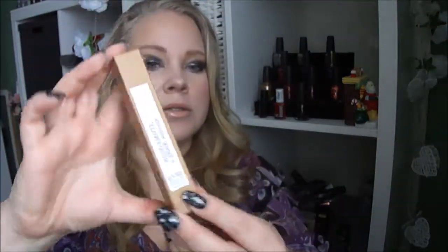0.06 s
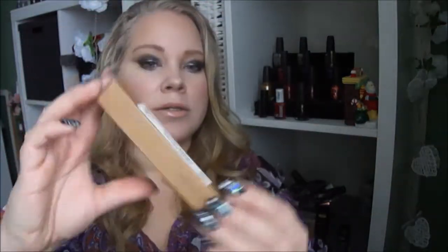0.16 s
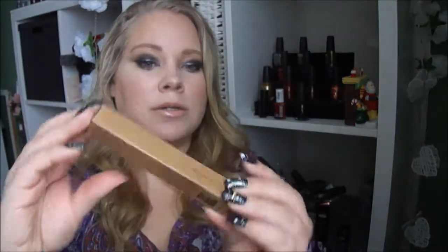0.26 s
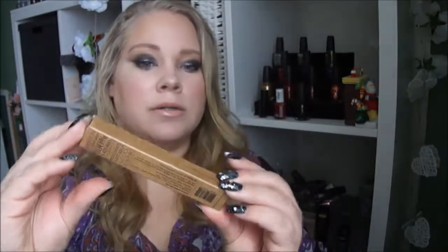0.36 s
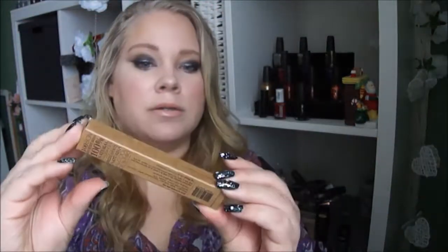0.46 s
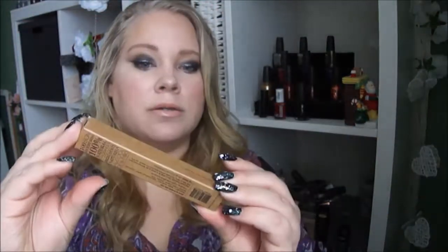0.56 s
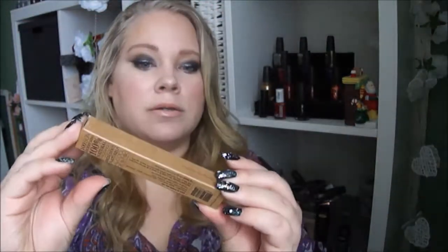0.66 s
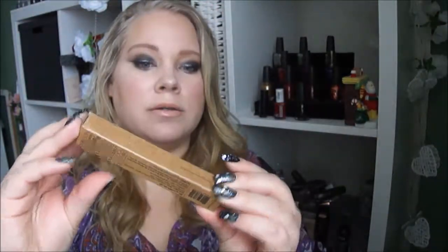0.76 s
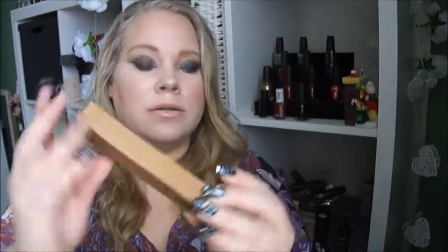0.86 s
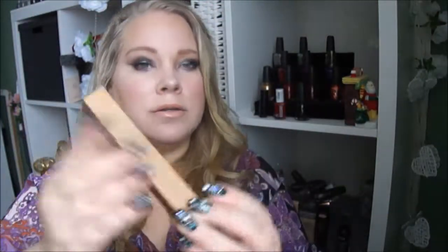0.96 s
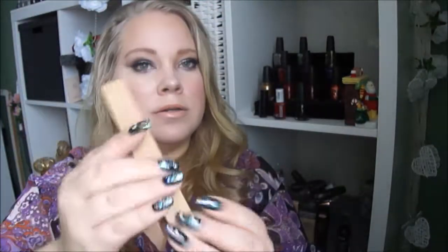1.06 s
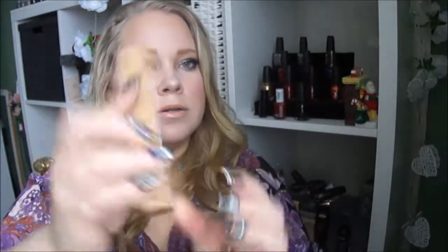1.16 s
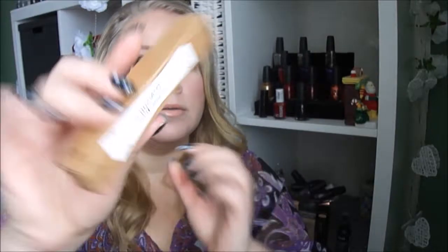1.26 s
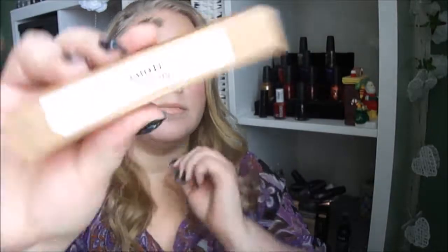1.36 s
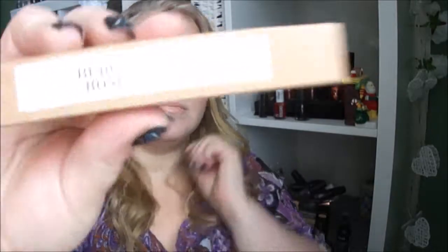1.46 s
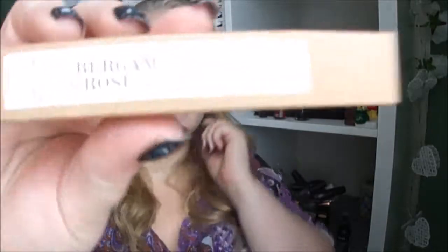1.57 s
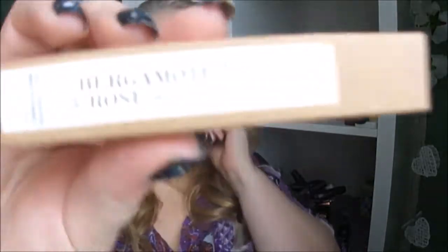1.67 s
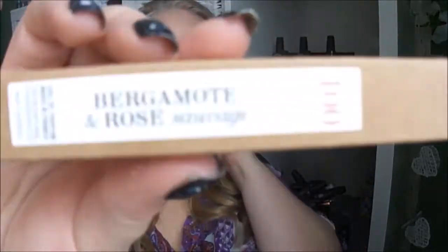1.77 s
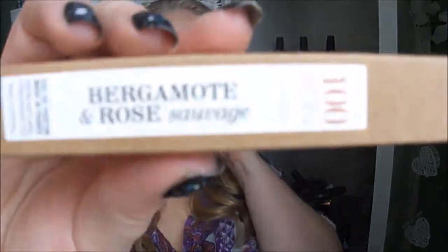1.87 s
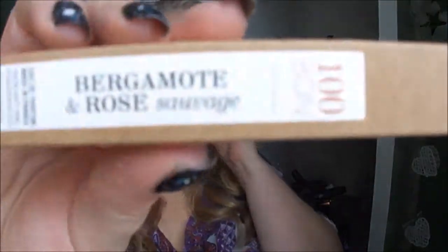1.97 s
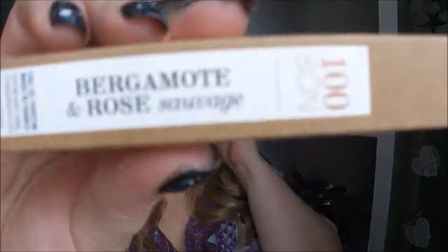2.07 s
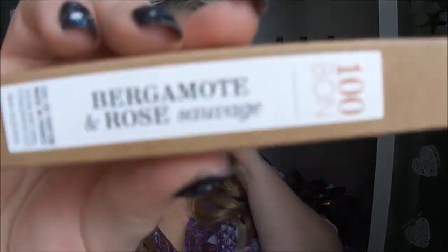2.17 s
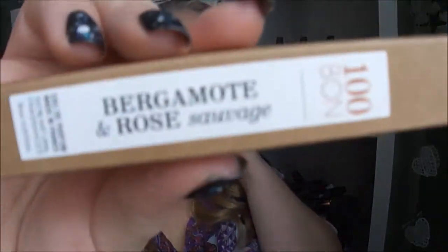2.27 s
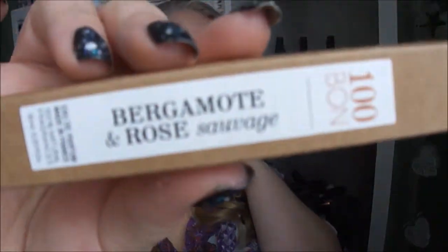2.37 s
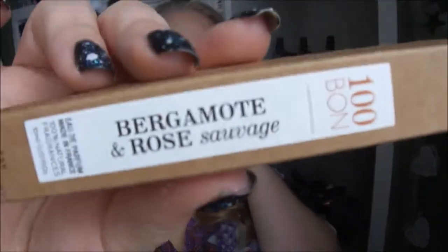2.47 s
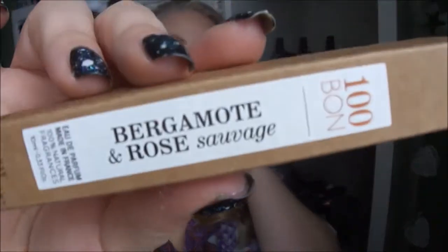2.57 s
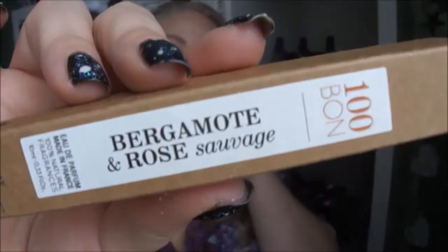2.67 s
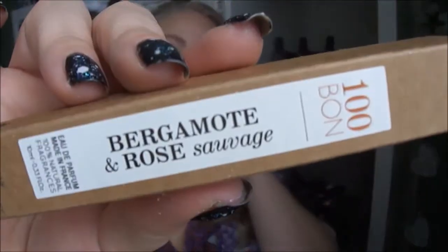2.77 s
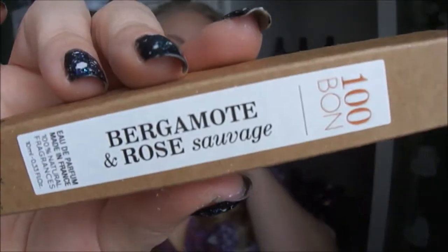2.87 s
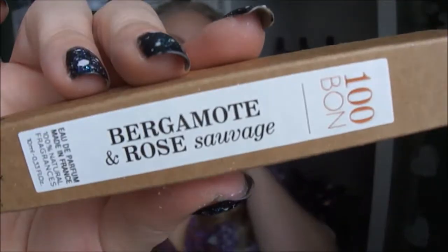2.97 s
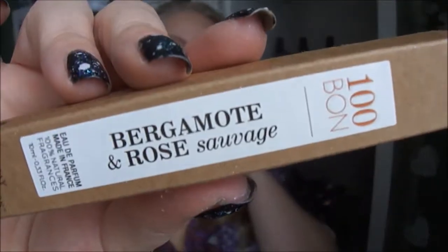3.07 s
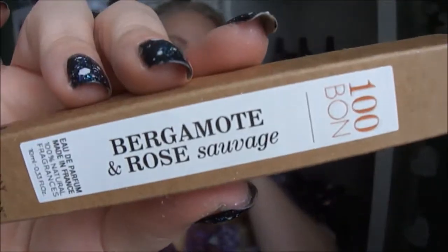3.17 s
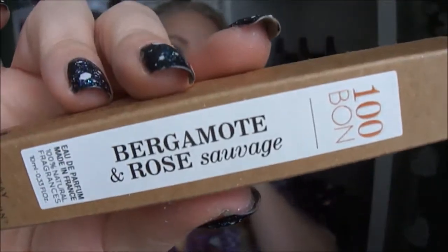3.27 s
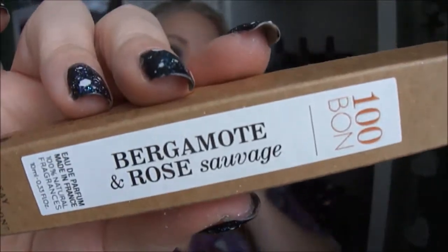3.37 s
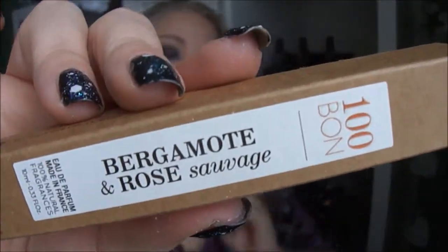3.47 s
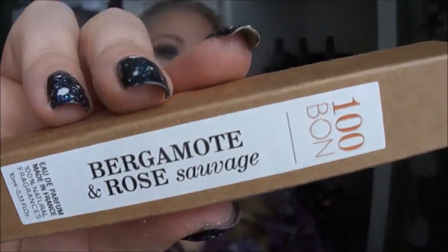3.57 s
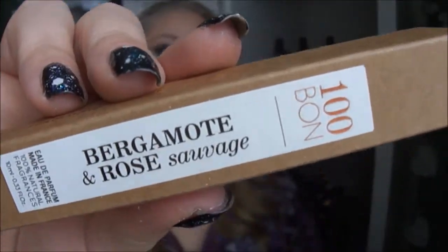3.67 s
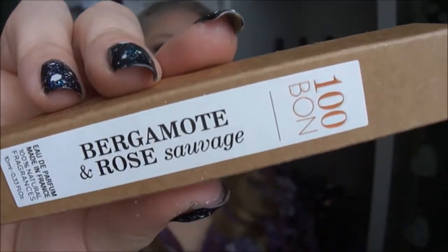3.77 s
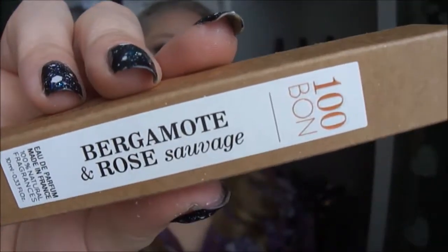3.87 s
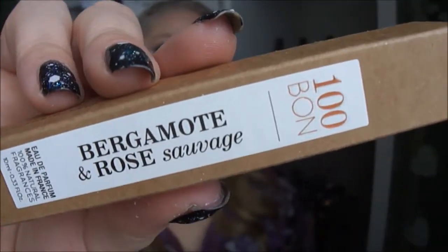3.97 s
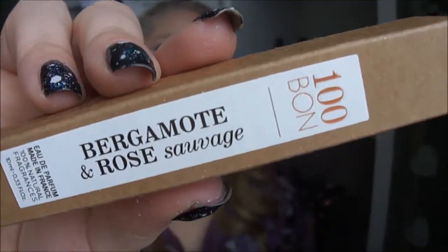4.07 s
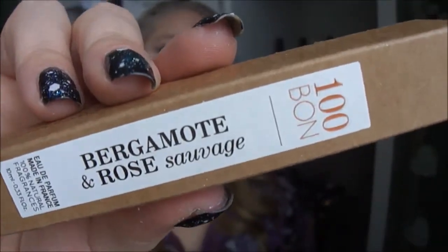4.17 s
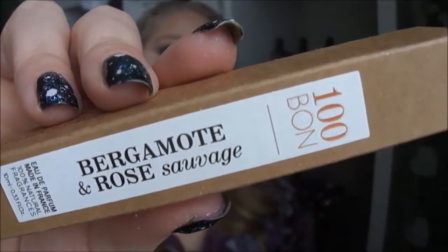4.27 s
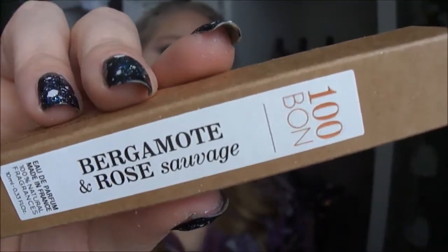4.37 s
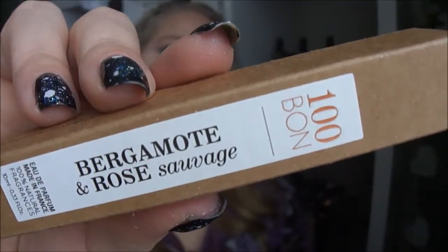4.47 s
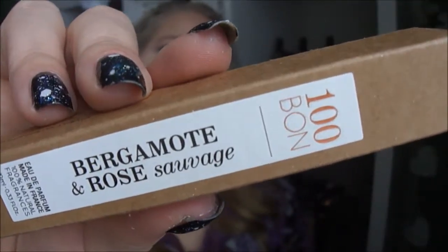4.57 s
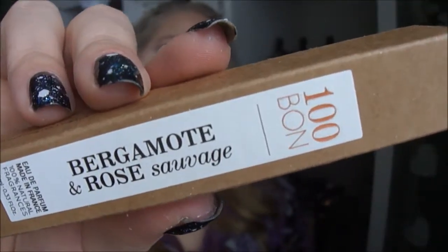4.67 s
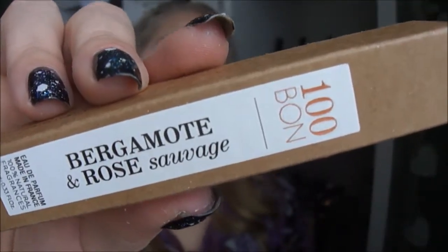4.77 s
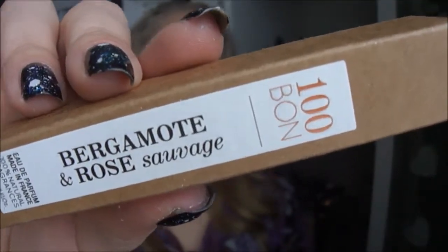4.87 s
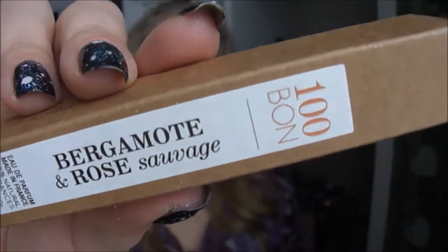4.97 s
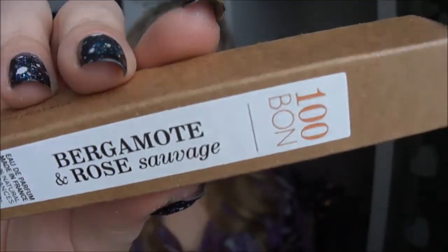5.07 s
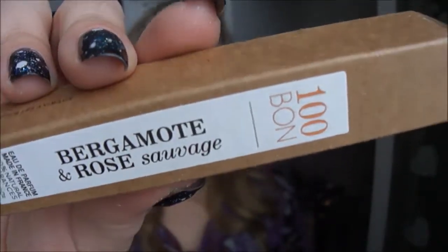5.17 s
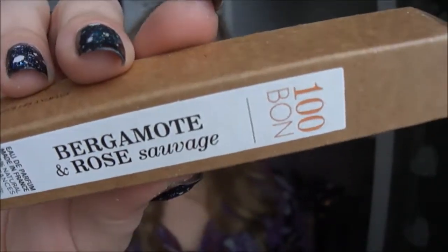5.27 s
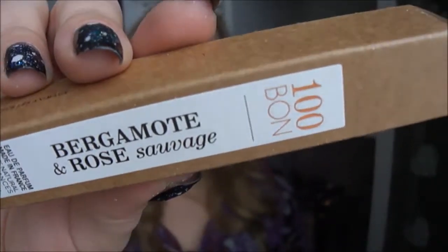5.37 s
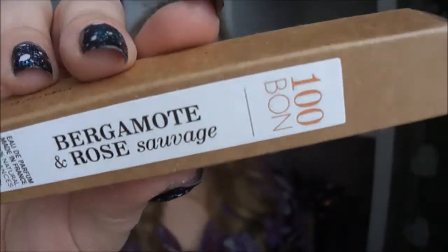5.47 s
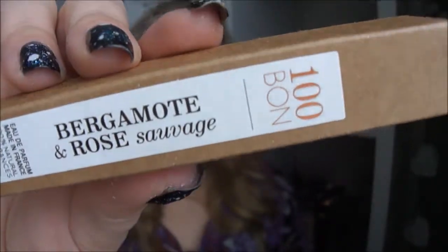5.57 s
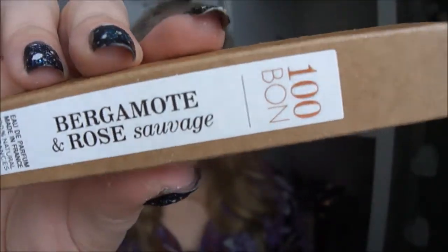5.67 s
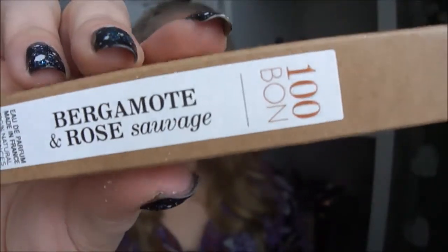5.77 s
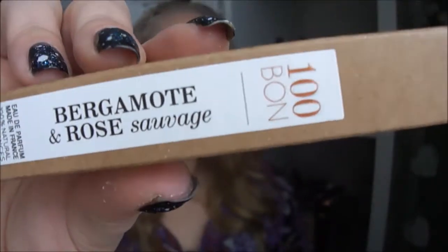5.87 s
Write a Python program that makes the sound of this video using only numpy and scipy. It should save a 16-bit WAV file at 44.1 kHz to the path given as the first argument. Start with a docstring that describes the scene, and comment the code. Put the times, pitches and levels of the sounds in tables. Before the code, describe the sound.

Close to a camera microphone in a small quiet room, fingers with long nails turn a slim cardboard box. Dry clicks, hollow knocks and brief scuffs cluster in the first half second, pause, then return from about one to just under two seconds. Afterwards come only sparse faint taps, with a clearer one near 3.7 seconds and a last knock at the end. Soft hiss and faint camera focus ticking lie behind.

```python
"""Fingers with long nails turn a slim cardboard box close to a camera microphone in a quiet room.
Nails and loose contents knock on the card: short bursts of contact ring the box's modes.
Skin and nails rub along it: dense random grains ring the same modes more briefly, stroke by stroke.
Behind them lie a faint room hiss of shaped noise, two thin electronic tones, and the camera's focus
drive, which ticks once a picture field while it hunts. Short echoes put a little room around the box."""
import sys
import numpy as np
from scipy import signal
from scipy.fft import rfft, irfft, next_fast_len
from scipy.io import wavfile
from scipy.ndimage import uniform_filter1d

SR = 44100
rng = np.random.default_rng(int(sys.argv[2]) if len(sys.argv) > 2 else 0)


def log_audio(samples):
    """Write samples as a 16-bit WAV file to the path given in sys.argv[1]."""
    # one column per channel
    frames = np.atleast_2d(samples).T
    # limit to full scale, then quantise
    limited = np.clip(frames, -1, 1)
    pcm = np.round(limited * 32767).astype(np.int16)
    wavfile.write(sys.argv[1], SR, pcm)


N = 261361  # length in samples

# Room tone at the microphone. Each row: frequency in Hz, relative density in dB per Hz.
ROOM_TONE = [(12, -53), (20, -23), (86, -15.5), (110, -11), (237, -3.5), (264, -2.5), (301, -2),
             (383, -1.5), (996, -2.5), (1170, -4.5), (1520, -5.5), (5460, -16), (6240, -16), (10600, -20),
             (11500, -22), (15000, -65), (22000, -120)]
HISS_DB = -52.0  # rms, ahead of the microphone's band limit

# Thin tones of the camera electronics. Each row: frequency in Hz, level in dB rms.
WHINE_TONES = [(7854, -81.5), (7881, -73)]

# Lens barrel, rung by the focus drive. Each row: frequency in Hz, relative level in dB, t60 in seconds.
BARREL_MODES = [(4630, -26, 0.0054), (6070, -20, 0.008), (6280, -4.5, 0.0071), (7300, -8.5, 0.0064),
                (9650, -11, 0.0022)]
# Spells of focus hunting. Each row: start in seconds, end in seconds,
# tick force in dB at the start, tick force in dB at the end.
FOCUS_HUNTS = [(-0.1, 0.615, -37, -41), (1.3, 4.7, -39, -43.5), (5.42, 5.85, -44, -38.5)]
FIELD_HZ, FIRST_TICK_S = 59.94, .0054
TICK_SPREAD_DB = 2.0  # scatter from tick to tick
JOLT_DB = 9.0  # the first and last step of a hunt are harder
WANDER_DB, WANDER_TICKS = 1.2, 4  # slower drift of the force

ROOM_T60_S, ROOM_DB, WALL_CUT_HZ = 0.12, -22, 11000

# What the box rings with. Each row: frequency in Hz, relative level in dB, t60 in seconds.
BOX_MODES = [(352, 5, 0.012), (483, -2.3, 0.032), (582, 0.75, 0.02), (840, 3, 0.014), (1016, 1.3, 0.015),
             (1255, 2.5, 0.017), (1435, -2.5, 0.017), (1836, 4.5, 0.011), (2190, 0, 0.017),
             (2450, -3.5, 0.019), (2933, 2.5, 0.011), (3350, -4.5, 0.012), (3727, 1, 0.0093),
             (4545, 3.5, 0.0059), (5750, 5.5, 0.0042), (6430, 4, 0.0062), (7730, 10, 0.0017),
             (9070, 2, 0.0039), (10040, 10, 0.0012)]

# Skin and nails sliding on the card. Each row: start in seconds, length in seconds, level in dB at the
# nominal end, brightness in dB per octave about 2400 Hz, fade over the stroke in dB.
STROKES = [(0.033, 0.037, -50.5, -1, -5.5), (0.096, 0.03, -54.5, 0.5, 14.5), (0.202, 0.035, -59.5, -1, 5),
           (0.32, 0.02, -51.5, 3, 1), (0.345, 0.017, -38.5, -1.5, -2), (0.367, 0.044, -56.5, -2.5, 14.5),
           (0.423, 0.021, -55, 4, 1), (0.474, 0.032, -61.5, -4.5, 10), (0.898, 0.035, -50, -0.2, -6),
           (0.951, 0.043, -49.5, 0.9, 9), (1.068, 0.04, -50, -0.6, 4), (1.131, 0.026, -50, 1, 1.5),
           (1.165, 0.028, -57, -0.5, 4), (1.215, 0.022, -45, 6.5, -6), (1.245, 0.051, -53, 0, -1),
           (1.292, 0.027, -48.5, 1, 4), (1.322, 0.04, -46.5, 1.5, 4), (1.372, 0.013, -44.5, 6.5, -4),
           (1.384, 0.028, -54.5, -4.5, 18), (1.431, 0.063, -50, -2.2, 1.5), (1.533, 0.054, -55.5, 2, -2.5),
           (1.613, 0.07, -51.5, 2, -8.5), (3.476, 0.14, -63.5, 4.5, -2), (5.857, 0.012, -64, -1, 3.5),
           (5.895, 0.02, -51.5, -0.5, 8)]
# Edges of the rubbing bands, in Hz.
RUB_EDGES_HZ = [600, 1700, 3300, 6000, 11500]
# Colour of a plain stroke. Each entry: level of one rubbing band in dB.
PLAIN_STROKE_DB = [-2, 1, -4.5, -3]
RUB_GRAINS_PER_S = 4000

# Knocks on the box. Each row: start in seconds, hollow thud in dB, wall in dB, nail snap in dB,
# wall pitch in Hz, contact in ms.
BOX_KNOCKS = [(0.0197, -38.5, -31.5, -37.5, 1110, 3.9), (0.092, -45.5, -48, -31.5, 2170, 4.3),
              (0.1036, -34, -34, -35, 1330, 0.93), (0.181, -50, -47, -42.5, 1580, 2.7),
              (0.2074, -47, -49, -62, 2200, 1.4), (0.3138, -49, -50, -39, 1860, 1.6),
              (0.3196, -40.5, -37, -33, 3480, 1.8), (0.3416, -30.5, -22, -22.5, 1410, 2.1),
              (0.3577, -25, -18.5, -24.5, 1430, 0.71), (0.3758, -53, -51, -54, 2240, 1.8),
              (0.4204, -42, -36.5, -32, 2580, 1.2), (0.4733, -60, -37.5, -35, 2600, 2.1),
              (0.9197, -55, -35.5, -50, 2550, 1.8), (0.9498, -27, -16.5, -23, 2540, 3.3),
              (1.0685, -41, -47, -42, 2350, 1.4), (1.0784, -33.5, -32.5, -32.5, 2240, 2.2),
              (1.1338, -64, -44, -37, 2240, 2.2), (1.1443, -64, -41.5, -34, 2000, 2.3),
              (1.1683, -48, -48, -46, 1770, 1.8), (1.2907, -35.5, -17.5, -18.5, 2540, 1.1),
              (1.32, -26, -20.5, -24, 1840, 7.2), (1.3217, -27, -28, -20.5, 1820, 5.2),
              (1.3811, -37.5, -22, -38, 3040, 5.8), (1.3851, -43, -21.5, -47, 2110, 1.1),
              (1.4361, -41, -28.5, -35.5, 2500, 6.6), (1.471, -48, -34.5, -36.5, 1320, 1.5),
              (1.5226, -36.5, -30.5, -42, 2060, 1.6), (1.6573, -31, -28.5, -31, 2040, 0.9),
              (1.6595, -33, -27, -48, 3160, 6.8), (1.67, -30.5, -29, -31.5, 1890, 4.4),
              (1.6826, -38.5, -39, -47, 2900, 3.1), (1.7231, -50, -43, -49, 1860, 1.8),
              (1.7357, -51, -37, -47.5, 2020, 2.4), (1.9754, -49.5, -47.5, -52, 2790, 1.6),
              (2.0188, -38.5, -31, -37, 2080, 2.6), (2.285, -43, -52, -48, 2820, 1.8),
              (2.4123, -46, -44, -49, 2240, 3.5), (2.4175, -41.5, -33.5, -50, 2300, 2.1),
              (2.488, -48, -56, -54, 2880, 2.5), (3.6923, -24.5, -32, -37, 1970, 1.6),
              (3.7011, -32.5, -23, -22.5, 3200, 2.8), (4.01, -42, -47, -44, 2830, 4.3),
              (4.083, -51, -60, -41.5, 3120, 2.5), (4.2693, -39, -36, -42, 3430, 3.4),
              (4.5035, -47, -46.5, -45, 2860, 1.7), (5.893, -62, -35, -54, 2120, 1.2),
              (5.8954, -28, -24.5, -36.5, 2140, 0.74), (5.9068, -39, -30.5, -33.5, 1730, 1.2),
              (5.92, -36, -45, -45, 2780, 1.3)]
# Pitch of the hollow, which changes with the grip. Each row: time in seconds, pitch in Hz.
HOLLOW_PITCH = [(0.0, 800), (0.3, 970), (0.48, 1050), (0.9, 637), (1.3, 602), (1.39, 736), (1.66, 604),
                (2.0, 517), (3.69, 540), (3.702, 440), (4.0, 710), (5.89, 577), (5.91, 764)]
THUD_FALL_DB_PER_OCTAVE = 3.5  # below the hollow's pitch
SNAP_HZ, SNAP_FALL_DB_PER_OCTAVE = 3760, 4.5  # the snap falls off above this pitch
FAVOUR_DB, FAVOUR_OCTAVES = 6.5, 0.24  # lift of modes near the wall or hollow pitch, and its reach
VALLEY_DB = 4  # dip midway between thud and wall
MODE_SPREAD_DB = 1.5  # scatter of each mode from knock to knock

MIC_EDGE_HZ, CUTOFF_HZ = 11000, 12360


def from_db(db):
    """Gain of a level in dB."""
    return 10 ** (np.asarray(db) / 20)


def rms_one(x):
    """Scales to unit rms."""
    return x / np.sqrt(np.mean(x ** 2) + 1e-20)


def ring(clicks, hz, t60):
    """A damped resonance: a unit click sets off a decaying sine that starts from height 1."""
    radius = from_db(-60 / (t60 * SR))
    w = 2 * np.pi * hz / SR
    return signal.lfilter([0, np.sin(w)], [1, -2 * radius * np.cos(w), radius ** 2], clicks + 1e-18)


def hiss():
    """Steady noise with the colour of the quiet room and the microphone."""
    size = next_fast_len(N)
    hz = np.maximum(np.arange(size // 2 + 1) * SR / size, 1)
    tone_hz, tone_db = np.transpose(ROOM_TONE)
    colour = from_db(np.interp(np.log(hz), np.log(tone_hz), tone_db))
    noise = irfft(rfft(rng.standard_normal(size)) * colour, size)[:N]
    return from_db(HISS_DB) * rms_one(noise)


def whine():
    """The camera electronics give steady sines, each with a random starting phase."""
    t = np.arange(N) / SR
    out = np.zeros(N)
    for hz, db in WHINE_TONES:
        out += np.sqrt(2) * from_db(db) * np.sin(2 * np.pi * (hz * t + rng.random()))
    return out


def focus_drive():
    """The drive steps at the field rate with uneven force, and each step rings the lens barrel."""
    ticks = np.arange(FIRST_TICK_S, N / SR - .01, 1 / FIELD_HZ)
    luck = rng.standard_normal((len(ticks), 2))
    wander = rms_one(uniform_filter1d(luck[:, 1], size=WANDER_TICKS))
    uneven_db = TICK_SPREAD_DB * luck[:, 0] + WANDER_DB * wander
    steps = np.zeros(N)
    for start, end, *levels_db in FOCUS_HUNTS:
        on = np.flatnonzero((ticks >= start) & (ticks <= end))
        force_db = np.interp(ticks[on], [start, end], levels_db) + uneven_db[on]
        to_nearest_end = np.minimum(ticks[on] - start, end - ticks[on])
        force_db += JOLT_DB * (to_nearest_end < 1 / FIELD_HZ)
        steps[np.round(ticks[on] * SR).astype(int)] = from_db(force_db)
    steps = signal.lfilter(np.hanning(5), 2, steps)  # each step is a soft pulse, not a bare click
    return sum(from_db(db) * ring(steps, hz, t60) for hz, db, t60 in BARREL_MODES)


def room(x):
    """Eight feedback delays return the sound from the walls, duller on every round."""
    size = next_fast_len(N + SR // 2)
    w = 2 * np.pi * np.arange(size // 2 + 1) / size
    dull = 1 / (1 + 1j * w * SR / (2 * np.pi * WALL_CUT_HZ))
    response = 0
    for k, lag in enumerate(rng.uniform(.004, .022, 8) * SR):
        loop = from_db(-60 * lag / SR / ROOM_T60_S) * dull * np.exp(-1j * w * lag)
        response = response + (-1) ** k * loop / (1 - loop)  # all rounds of this delay at once
    return irfft(rfft(x, size) * response, size)[:N]


def rub():
    """Ridges catch on the fibres: dense grains ring the walls, each stroke with its own colour."""
    grains = from_db(1.8 * np.minimum(rng.exponential(1, N), 4)) * rng.choice([-1, 1], N)
    grains *= rng.random(N) < RUB_GRAINS_PER_S / SR
    walls = np.zeros(N)
    for k, (hz, _, t60) in enumerate(BOX_MODES):
        walls += (-1) ** k * ring(grains, hz, 0.42 * t60)  # shorter ring than for a knock
    t = np.arange(N) / SR
    out = np.zeros(N)
    for k, edges in enumerate(zip(RUB_EDGES_HZ, RUB_EDGES_HZ[1:])):
        pressure = np.zeros(N)
        octaves = np.log2(np.sqrt(edges[0] * edges[1]) / 2400)
        for s, length, level_db, bright_db, fade_db in STROKES:
            part = slice(int((s - .2 * length) * SR), int((s + 1.3 * length) * SR))
            since = t[part] - s
            rise = since / (.2 * length) + 1
            fall = (length - since) / (.3 * length) + 1
            touching = np.clip(np.minimum(rise, fall), 0, 1)
            stroke_db = level_db + PLAIN_STROKE_DB[k] + bright_db * octaves
            stroke_db = stroke_db + fade_db * (1.0 - since / length)
            pressure[part] += touching * from_db(stroke_db)
        band_filter = signal.butter(2, edges, "band", fs=SR, output="sos")
        # neighbouring bands in opposite sign join without a gap
        out += (-1) ** k * pressure * rms_one(signal.sosfilt(band_filter, walls))
    return out


def knock_colour_db(hz, thud_db, wall_db, snap_db, hollow_hz, wall_hz):
    """Drive of one mode by every knock: thud in the bass, wall in the middle, nail snap on top."""
    if hz >= SNAP_HZ:
        return snap_db - SNAP_FALL_DB_PER_OCTAVE * np.log2(hz / SNAP_HZ)
    colour_db = []
    for thud, wall, snap, low, pitch in zip(thud_db, wall_db, snap_db, hollow_hz, wall_hz):
        corners_hz = [low, np.sqrt(low * pitch), pitch, SNAP_HZ]
        corners_db = [thud, (thud + wall) / 2 - VALLEY_DB, wall, snap]
        colour_db.append(np.interp(np.log(hz), np.log(corners_hz), corners_db))
    below_octaves = np.maximum(np.log2(hollow_hz / hz), 0)
    return np.array(colour_db) - THUD_FALL_DB_PER_OCTAVE * below_octaves


def knocks():
    """Each contact is a sharp first touch and a dying chatter; where it lands decides which modes it favours."""
    s, thud_db, wall_db, snap_db, wall_hz, contact_ms = np.transpose(BOX_KNOCKS)
    hollow_hz = np.interp(s, *np.transpose(HOLLOW_PITCH))
    steps = np.arange(600)
    chatter = rng.standard_normal((len(s), 600)) * (rng.random((len(s), 600)) < .12)
    chatter[:, 0] = -4.0  # the first touch
    contact_samples = np.maximum(contact_ms, .1)[:, None] / 1000 * SR
    chatter *= np.exp(-steps / contact_samples)
    luck = rng.standard_normal((len(s), len(BOX_MODES)))
    at = (np.round(s * SR).astype(int)[:, None] + steps).ravel()
    chatter_power = np.abs(rfft(chatter, 2048, axis=1)) ** 2
    bin_hz = np.arange(1025) * SR / 2048
    out = np.zeros(N)
    for k, (hz, level_db, t60) in enumerate(BOX_MODES):
        colour_db = knock_colour_db(hz, thud_db, wall_db, snap_db, hollow_hz, wall_hz)
        off_octaves = np.minimum(abs(np.log2(hz / wall_hz)), abs(np.log2(hz / hollow_hz)))
        favour_db = FAVOUR_DB * np.exp(-(off_octaves / FAVOUR_OCTAVES) ** 2)
        strength = from_db(colour_db + level_db + favour_db + MODE_SPREAD_DB * luck[:, k])
        # the chatter's energy as this mode feels it is set to one
        weight = 1 / (1 + ((bin_hz - hz) * t60 / 1.1) ** 2)
        strength /= np.sqrt(chatter_power @ weight / weight.sum())
        force = np.bincount(at, (chatter * strength[:, None]).ravel(), N + 600)[:N]
        out += (-1) ** k * ring(force, hz, t60)
    # so slim a box radiates no bass
    return signal.sosfilt(signal.butter(3, 280, "high", fs=SR, output="sos"), out)


def scene():
    """Box close to the microphone, a little room around it, hiss and camera noise behind."""
    box = knocks() + rub()
    echoes = from_db(ROOM_DB) * room(box)
    camera = focus_drive() + whine()
    return (box + echoes + hiss() + camera)[None]


def record(dry):
    """The camera microphone's band falls off above 11 kHz, and a steep low-pass cuts the top."""
    mic_band = signal.ellip(8, .5, 36, MIC_EDGE_HZ, fs=SR, output="sos")
    top_cut = signal.cheby2(12, 50, CUTOFF_HZ, fs=SR, output="sos")
    narrow = signal.sosfilt(mic_band, dry)
    return signal.sosfilt(top_cut, narrow)


dry = scene()
out = record(dry)
log_audio(out)
```